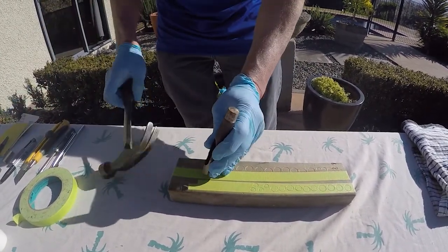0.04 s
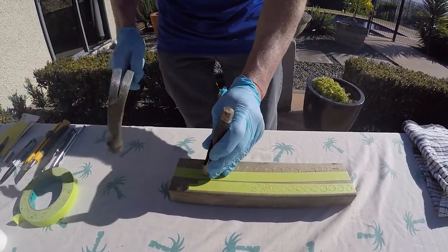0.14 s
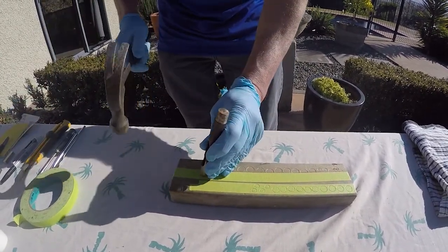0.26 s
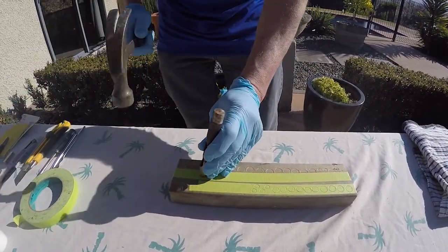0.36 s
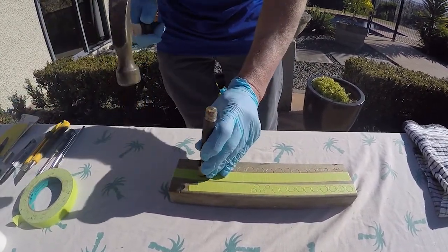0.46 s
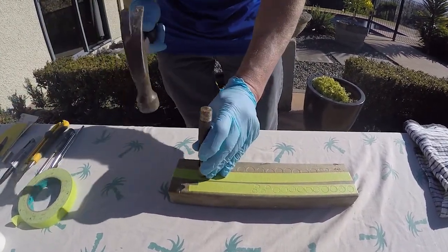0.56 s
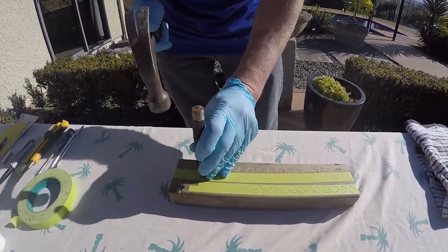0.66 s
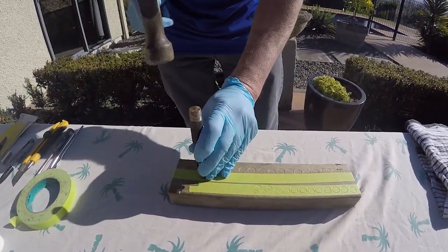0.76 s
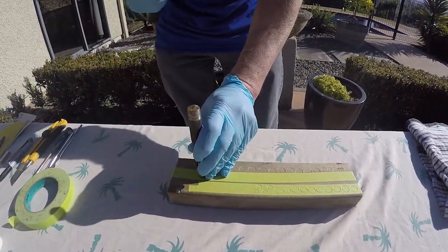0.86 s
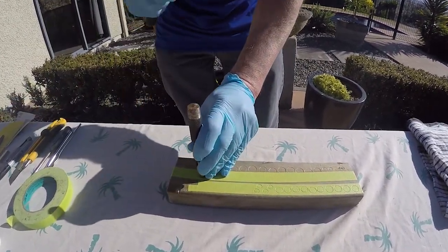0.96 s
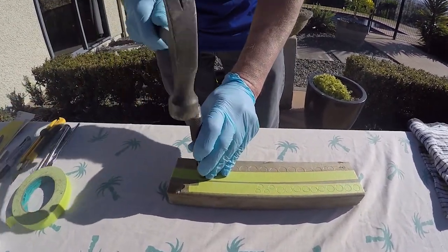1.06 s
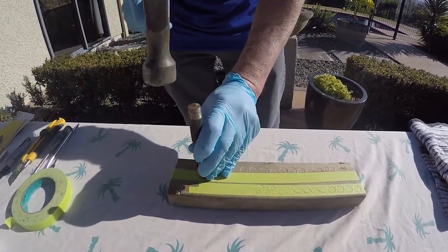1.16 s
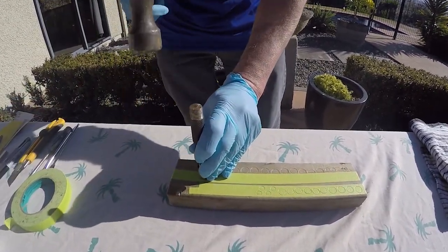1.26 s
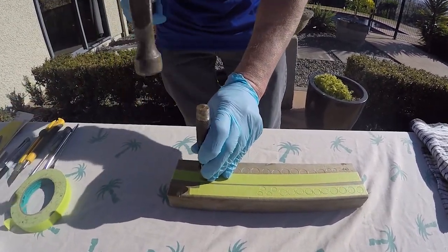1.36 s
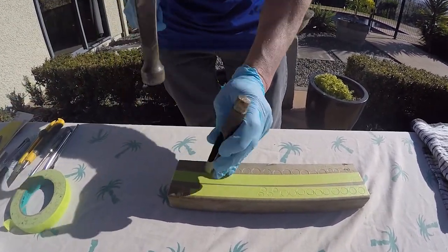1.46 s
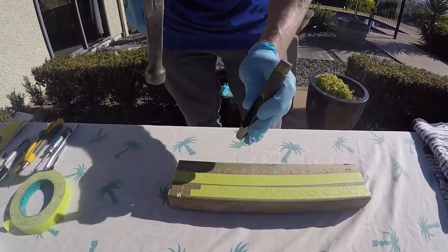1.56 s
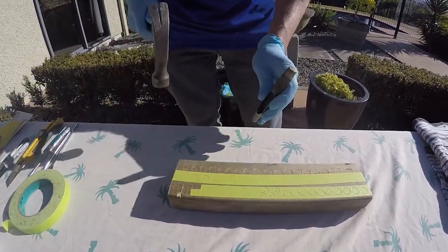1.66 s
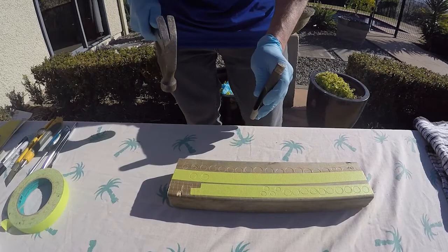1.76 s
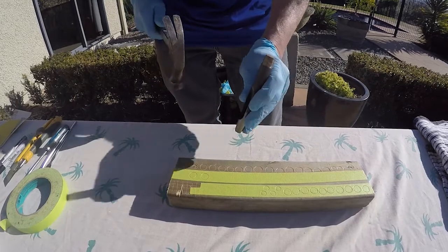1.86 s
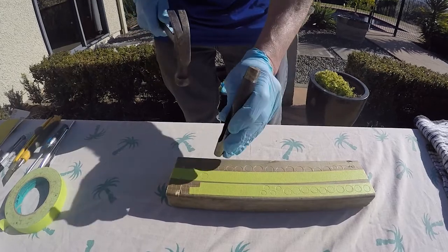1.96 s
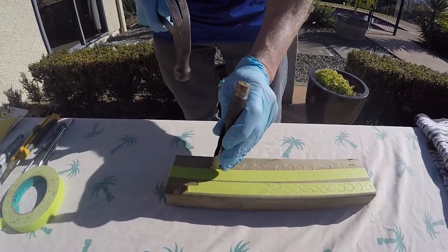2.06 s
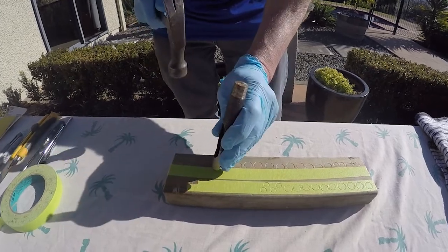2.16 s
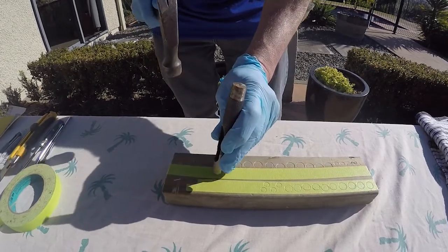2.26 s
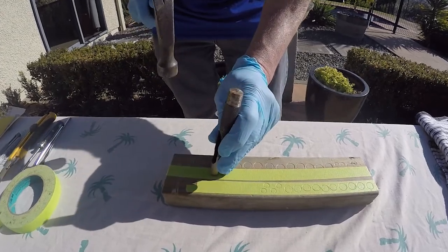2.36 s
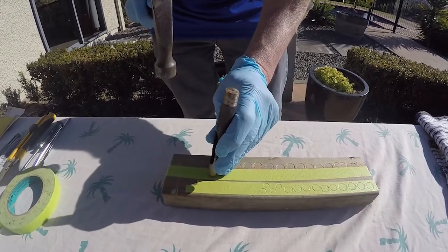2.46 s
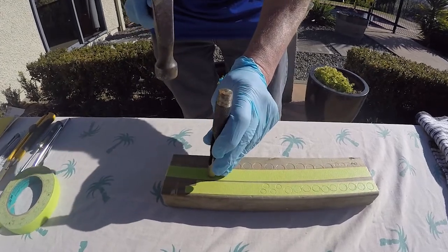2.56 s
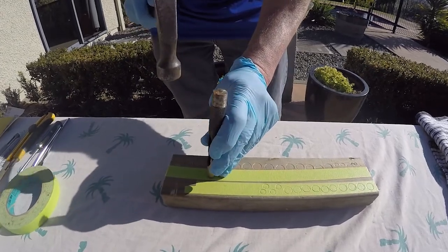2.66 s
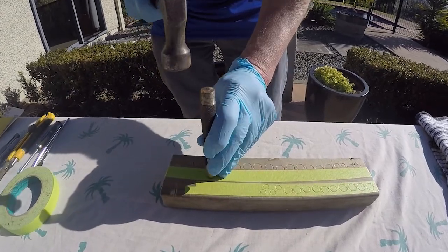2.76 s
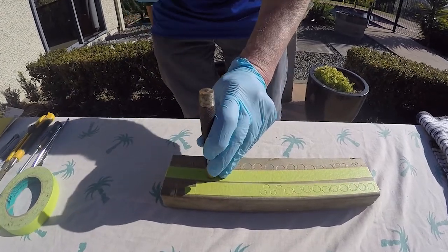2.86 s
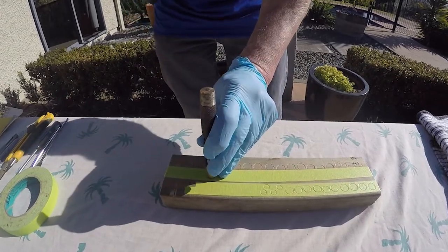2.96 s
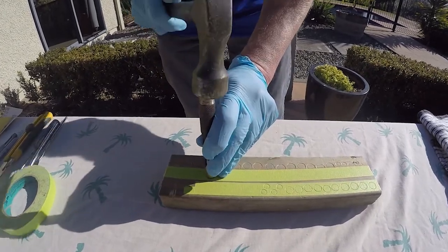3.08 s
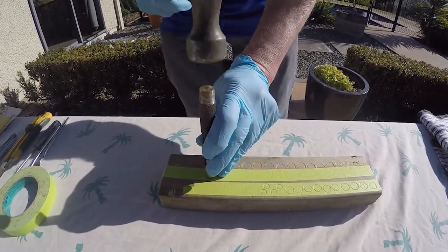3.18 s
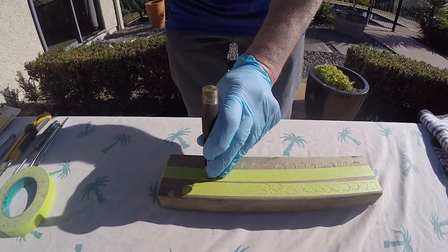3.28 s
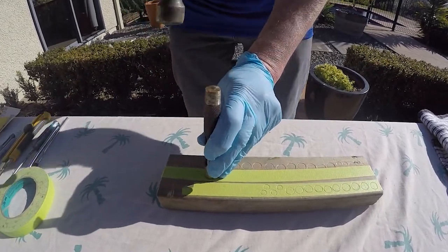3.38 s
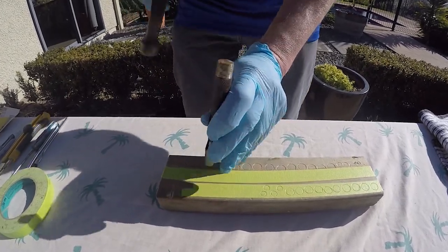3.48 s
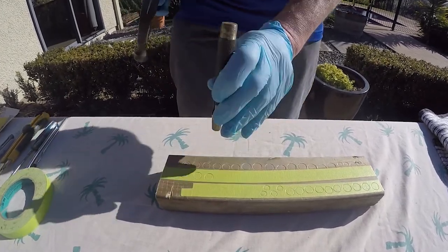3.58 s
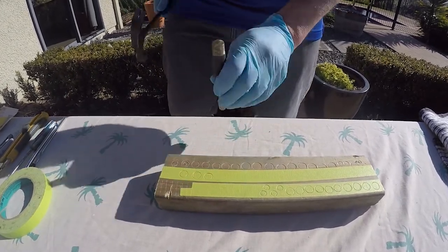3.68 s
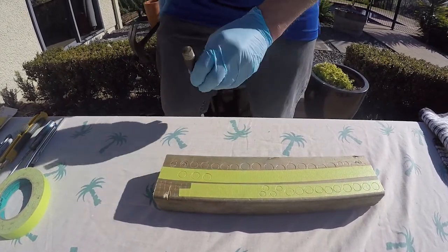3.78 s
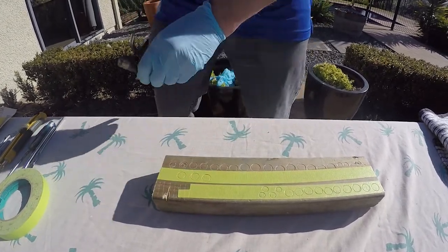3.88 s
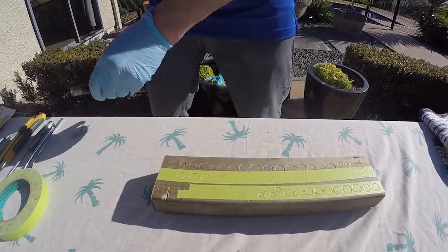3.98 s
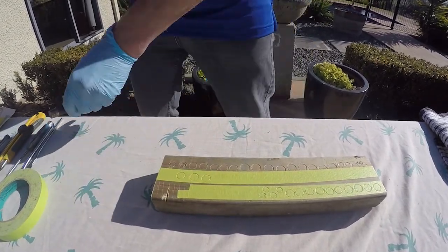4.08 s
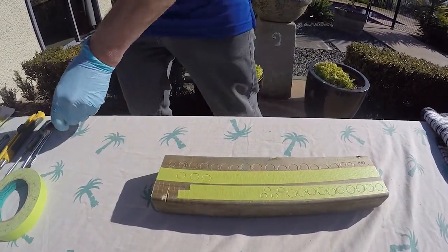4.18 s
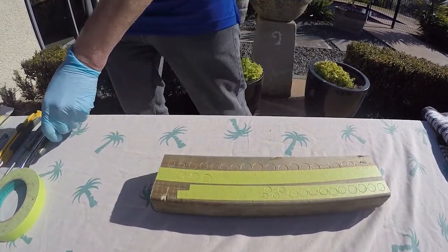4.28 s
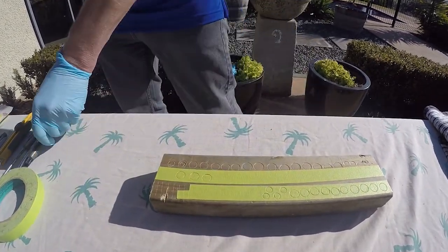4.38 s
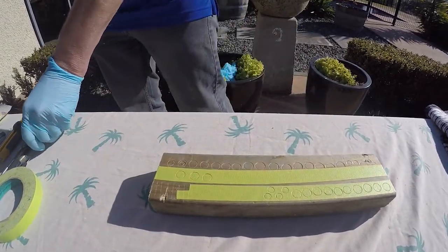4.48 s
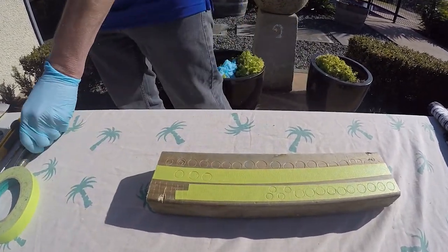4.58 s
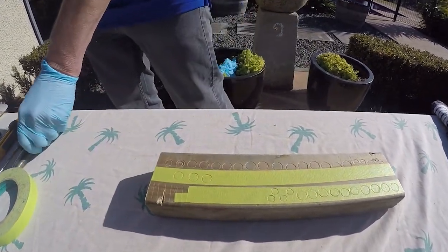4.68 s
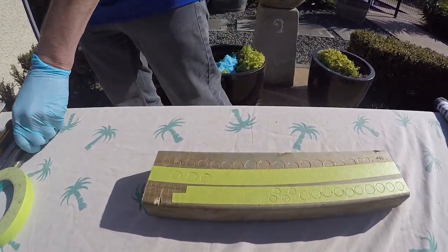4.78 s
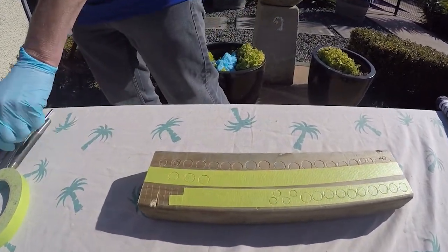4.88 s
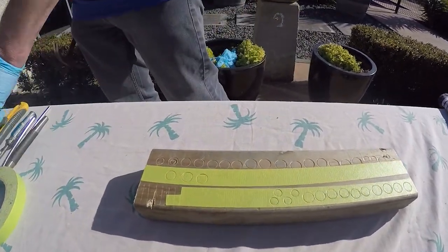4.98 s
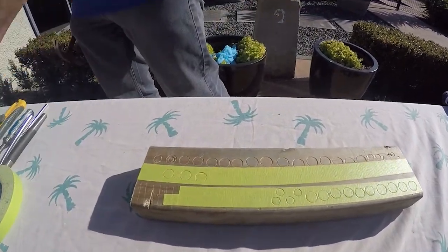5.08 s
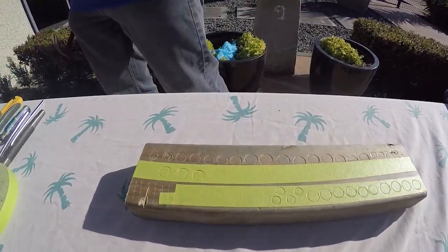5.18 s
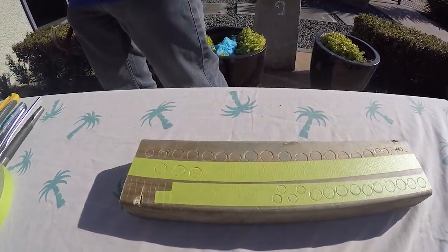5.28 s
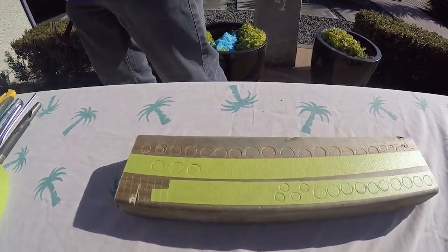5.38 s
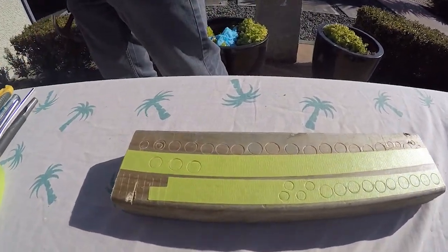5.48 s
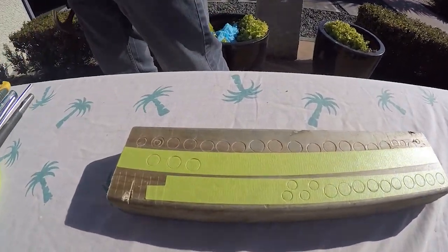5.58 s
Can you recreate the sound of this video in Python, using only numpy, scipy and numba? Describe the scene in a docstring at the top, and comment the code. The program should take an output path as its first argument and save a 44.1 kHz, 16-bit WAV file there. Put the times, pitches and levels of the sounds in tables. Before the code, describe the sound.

A close camera microphone on a patio table hears low, wavering machine hum around 40 to 80 Hz, rumble and soft outdoor air. Faint glove and cloth rubbing opens the scene; at 0.4 s a punch bumps softly onto a wooden block, and a far bird gives a thin downward whistle at 0.6 s. At 1.06 s a hammer hits the steel punch: an extremely loud, clipped crack, dry wood clack, low table thump and quick house echo, with the background ducked and slowly returning. A tiny tick follows at 1.4 s, the bird at 2.2 s, another soft bump at 2.5 s. The second, slightly duller blow lands at 3.09 s, with a faint pull-free scuff at 3.5 s. The bird whistles again at 3.9 s. Cloth rustles around 4.2 to 4.5 s, then the hammer's handle thuds and its head clacks on the table at 4.58 s. Light brushing leads to a short, dull camera knock at 5.55 s.

```python
"""On a patio, two hammer blows drive a steel hole punch through tape into a wooden block on a cloth-covered table.
Each blow is a set of dying tones and noise: steel cracks, wood clacks, the table thumps, the house echoes.
The blows overload the camera: their first moments clip, then its limiter turns the background down.
Soft noise makes the handling and rubbing; the hammer is put down, then the camera is knocked.
Behind it all are a wavering machine hum, rumble, outdoor air and a far bird's sliding whistles."""
import sys
import numpy as np
from scipy import signal
from scipy.fft import rfft, irfft
from scipy.io import wavfile
from scipy.ndimage import uniform_filter1d
from numba import njit

SR = 44100
rng = np.random.default_rng(int(sys.argv[2]) if len(sys.argv) > 2 else 0)


def store_pcm(level_fs):
    """Save levels as 16-bit WAV."""
    pcm = np.round(np.clip(level_fs, -1, 1) * 32767).astype(np.int16)
    wavfile.write(sys.argv[1], SR, np.atleast_2d(pcm).T)


N = 248660  # length in samples
TIME = np.arange(N) / SR  # seconds from the start
AGE = np.arange(SR) / SR  # seconds since a hit

# In all tables t60_s is the time a tone or noise takes to fade by 60 dB.
# Noise colours give only the balance between pitches; overall loudness is set where they are used.

# hammer blows: start_s, level_db, steel_db, brightness_db_per_octave, block_db, punch_ring_db,
# block_pitch_ratio, strongest_steel_hz
BLOWS = [(1.063, 15, 0, 0.5, 2.5, -1.5, .99, 2888), (3.0940, 17, 1, -0.5, 0, -9.5, 1.03, 3792)]
# hammer face and punch while they touch, before the brightness tilt: pitch_hz, level_db, t60_s
STEEL_MODES = [(1572, -1.5, 0.018), (2066, -3, 0.015), (2480, -6, 0.0089), (2870, -5, 0.018),
               (3870, -2, 0.0094), (4345, 0, .014), (5057, -0.5, 0.012), (5420, -5, 0.014),
               (6050, -7, .014), (7850, -9.5, 0.014)]
# noise colour of the crack, before the brightness tilt: pitch_hz, level_db_per_hz
CRACK_COLOUR = [(200, -2.5), (1000, -3), (2000, 0), (4500, 3), (6500, -5.5), (9000, -11.5), (15000, -19.5)]
# the punch ringing on in the gloved hand: pitch_hz, level_db, t60_s
PUNCH_MODES = [(2866, -30, .18), (3013, -32, .2), (7830, -40, 0.2), (7920, -38.5, .27), (8030, -37.5, .22),
               (8240, -42.5, .17)]
# the wooden block, before the blow's pitch ratio: pitch_hz, level_db, t60_s
BLOCK_MODES = [(326, -16, .14), (378, -20.5, 0.15), (449, -24.5, 0.14), (523, -22, .18), (631, -26.5, .16),
               (852, -29, .18), (904, -28, 0.22), (992, -19, 0.081), (1143, -27, .14), (1534, -25.5, 0.21),
               (1635, -25, 0.16), (2394, -28, .14), (2620, -28, .15), (3090, -30, 0.16)]
# the table top: pitch_hz, level_db, t60_s
TABLE_MODES = [(33.5, -9.5, .33), (47.5, -12, 0.13), (88, -15, .16), (114, 0.5, .14), (114, -20.5, .4),
               (160, -13, .07), (190, -30, 0.81), (220, -10, 0.082)]
# noise colour of the dense upper tones of block and table: pitch_hz, level_db_per_hz
WOOD_COLOUR = [(150, -2), (300, 1.5), (1000, 2), (1800, -6.5), (3000, -5.5), (5000, -18.5), (9000, -25),
               (15000, -36.5)]
# noise colour of a blow as the patio sends it back: pitch_hz, level_db_per_hz
PATIO_COLOUR = [(60, -5), (250, 2.5), (900, -1.5), (1700, -3.5), (3200, -10), (5000, -20), (8500, -27.5),
                (15000, -40)]
# noise colour of the farther garden's faint, long answer: pitch_hz, level_db_per_hz
GARDEN_COLOUR = [(150, -6), (400, 0), (1600, -4), (2400, -8), (3100, -5), (4200, -20), (15000, -50)]
# single hard reflections from the house: delay_s, level_db
HOUSE_SLAPS = [(.042, -31.5), (.095, -33), (.106, -47), (.137, -45.5)]
# the punch is set down on the tape before each blow: start_s, level_db
PLACINGS = [(.372, -39.5), (2.541, -39.5)]
# the punch is pulled free after each blow: start_s, level_db, centre_hz, width_octaves, t60_s
PULLS = [(1.441, -53, 8850, .3, 0.023), (3.472, -46, 1100, 0.91, .09)]
# the hammer head landing on the table: pitch_hz, level_db, t60_s
LANDING_MODES = [(182, -35, 0.27), (383, -35, 0.12), (592, -30.5, 0.17), (910, -13, 0.044),
                 (1139, -20, 0.085), (1430, -22, 0.091), (1717, -23, 0.06), (2040, -25.5, 0.09),
                 (2610, -20, 0.033), (3087, -21, 0.022), (4550, -38, 0.23), (4870, -43.5, 0.16),
                 (8204, -66, 0.24)]
# noise colour of that landing: pitch_hz, level_db_per_hz
LANDING_COLOUR = [(150, 0), (500, -2), (1000, 3.5), (2000, 0), (3200, -9), (4000, -19), (5000, -26),
                  (8000, -46), (15000, -69)]
# the camera housing when knocked: pitch_hz, level_db, t60_s
HOUSING_MODES = [(379, -33, 0.12), (534, -33, .14), (745, -27.5, 0.14), (995, -20.5, 0.071),
                 (1225, -27, 0.079), (1630, -25, 0.069), (2023, -30.5, 0.045)]
# noise colour of that knock: pitch_hz, level_db_per_hz
HOUSING_COLOUR = [(200, -9), (600, -3.5), (1200, 3.5), (1900, -13), (2500, -28), (3600, -28), (5000, -52),
                  (15000, -63)]
# glove and hammer sliding on cloth: start_s, length_s, level_db
SLIDES = [(-.1, 0.23, -54), (0.097, 0.14, -58.5), (4.193, .16, -57.5), (4.385, 0.08, -44.5),
          (4.435, 0.084, -47)]
# noise colour of the cloth: pitch_hz, level_db_per_hz
CLOTH_COLOUR = [(300, -13), (800, 6), (1500, 2), (2800, -4.5), (4500, -12), (8000, -21), (15000, -35)]
# gloves brushing over tools and camera: start_s, length_s, level_db
BRUSHES = [(4.23, .015, -57.5), (4.563, 0.012, -41), (5.476, .01, -50), (5.486, .018, -48),
           (5.517, .012, -55.5)]
# noise colour of the glove: pitch_hz, level_db_per_hz
GLOVE_COLOUR = [(300, -5), (1500, 4.5), (4500, -1), (8000, -8), (15000, -22)]
# a far bird repeats one call: start_s, level_db, final_hz
BIRD_CALLS = [(.635, -66, 3300), (2.225, -68, 2990), (3.885, -65, 3080)]
# hum of a distant machine, before it wavers: pitch_hz, rms_db
HUM_TONES = [(39.2, -42.5), (78.3, -39), (117.5, -51.5)]
# noise colour of the low rumble: pitch_hz, level_db_per_hz
RUMBLE_COLOUR = [(12, -9.5), (28, -1), (44, 0), (60, -2.5), (85, -0.5), (110, -3.5), (140, -15),
                 (200, -23.5), (400, -62.5)]
# noise colour of the outdoor air: pitch_hz, level_db_per_hz
AIR_COLOUR = [(76, -29), (130, -2.5), (179, -10), (205, -10.5), (373, -19.5), (512, -20.5), (650, -22.5),
              (858, -20), (2100, -32.5), (3310, -34.5), (4290, -37.5), (15000, -52.5)]

# the table springs back just after each blow
REBOUND_S, REBOUND_LENGTH_S, REBOUND_DB = 0.0033, 0.0046, 0
GARDEN_DB, GARDEN_T60_S = -52, 0.9
# nearby walls keep the echo up for a moment, then it drains into the garden
ECHO_RISE_S, ECHO_HOLD_S = 0.005, 0.062
ECHO_SAG_DB_PER_S, ECHO_FALL_DB_PER_S = 80, 183
# the dull answer of the block when the punch is placed
BUMP_HZ, BUMP_OCTAVES, BUMP_T60_S = 340, 0.65, 0.085
# the handle meets the cloth just before the hammer head lands
HAMMER_DOWN_S, HANDLE_LEAD_S = 4.5781, 0.012
HANDLE_DB, HANDLE_HZ, HANDLE_OCTAVES, HANDLE_T60_S = -26, 486, 0.63, 0.085
CAMERA_KNOCK_S = 5.5473
CALL_START_HZ, CALL_SLIDE_S, CALL_LENGTH_S = 4400, 0.078, 0.115
AIR_DB = -49.5
TOP_HZ = 15350  # the camera passes little above this pitch


def blows():
    """Steel cracks on steel; the block clacks; the table is pushed away from the microphone and springs back."""
    out = np.zeros(N)
    rebound_part = np.clip((AGE - REBOUND_S) / REBOUND_LENGTH_S, 0, 1)
    rebound = undb(REBOUND_DB) * np.sin(np.pi * rebound_part)
    table = rebound - swell(0.0027) * ring(TABLE_MODES)
    for s, db, steel_db, brightness, block_db, punch_db, pitch, strongest_hz in BLOWS:
        colour = tilted(CRACK_COLOUR, brightness)
        crack = ring(tilted(STEEL_MODES, brightness))
        crack += ring([(strongest_hz, -1, 0.017)])  # the steel tone driven hardest: Hz, dB, t60 s
        crack += undb(-2) * noise(colour, SR) * fade(0.022)
        steel = undb(steel_db) * crack + undb(punch_db) * ring(PUNCH_MODES)

        wood = ring(BLOCK_MODES, pitch) + undb(-12) * noise(WOOD_COLOUR, SR) * fade(0.1)
        block = undb(block_db) * swell(0.0011) * wood
        echo = undb(-25) * scatter(PATIO_COLOUR)
        add(out, s, undb(db) * (steel - block + table + echo))

        garden = noise(GARDEN_COLOUR, SR) * fade(GARDEN_T60_S)
        add(out, s, undb(db + GARDEN_DB) * garden)
        for delay_s, slap_db in HOUSE_SLAPS:
            slap = noise(colour, SR) * swell(0.001) * fade(0.04)
            add(out, s + delay_s, undb(db + slap_db) * slap)
    return out


def punch_handling():
    """The punch bumps the block as it is placed, and ticks as it comes out of the cut."""
    out = np.zeros(N)
    for s, db in PLACINGS:
        add(out, s, puff(db, BUMP_HZ, BUMP_OCTAVES, BUMP_T60_S))
    for s, db, hz, octaves, t60 in PULLS:
        add(out, s, puff(db, hz, octaves, t60))
    return out


def hammer_down():
    """The hammer is laid on the table: the handle thuds, then the head clacks and rings."""
    out = knock(HAMMER_DOWN_S, LANDING_MODES, LANDING_COLOUR,
                clack_db=-9, clack_t60=0.05, contact_s=0.00061, echo_db=-38)
    handle = swell(0.00072) * puff(HANDLE_DB, HANDLE_HZ, HANDLE_OCTAVES, HANDLE_T60_S)
    add(out, HAMMER_DOWN_S - HANDLE_LEAD_S, handle)
    return out


def camera_knock():
    """The camera housing is knocked: a short clack with dull, quickly fading tones."""
    return knock(CAMERA_KNOCK_S, HOUSING_MODES, HOUSING_COLOUR,
                 clack_db=-15.5, clack_t60=0.046, contact_s=0.0009, echo_db=-45)


def knock(s, modes, colour, clack_db, clack_t60, contact_s, echo_db):
    """A cushioned contact noise, the ring of the thing that was knocked, and its echo."""
    out = np.zeros(N)
    clack = undb(clack_db) * noise(colour, SR) * fade(clack_t60)
    echo = undb(echo_db) * scatter(colour)
    add(out, s, swell(contact_s) * (ring(modes) + clack) + echo)
    return out


def friction(strokes, colour, grain_db):
    """Each stroke of rubbing grows and fades, catching unevenly."""
    stroke_level = np.zeros(N)
    for s, length, db in strokes:
        part = np.clip((TIME - s) / length, 0, 1)
        stroke_level += undb(db) * np.sin(np.pi * part)
    grain = undb(grain_db * walk(300))
    return stroke_level * grain * noise(colour, N)


def bird():
    """Thin, fluttering whistles that slide down to a slightly wavering held note."""
    out = np.zeros(N)
    for s, db, final_hz in BIRD_CALLS:
        slide_hz = np.interp(TIME - s, [0, CALL_SLIDE_S], [CALL_START_HZ, final_hz])
        hz = slide_hz * (1 + 0.014 * walk(200))
        part = np.clip((TIME - s) / CALL_LENGTH_S, 0, 1)
        arch = 2 * np.sqrt(part * (1 - part))  # silent at both ends of the call
        flutter_db = 3.5 * walk(70)
        out += undb(db + flutter_db) * arch * np.sin(2 * np.pi * np.cumsum(hz) / SR)
    return out


def far(x, wet_db=-7):
    """A distant sound, smeared by its reflections."""
    response = scatter(CRACK_COLOUR)
    response = response / np.linalg.norm(response)
    return x + undb(wet_db) * signal.fftconvolve(x, response)[:N]


def background():
    """A machine hum wavering in pitch and level, over low rumble and steady outdoor air."""
    clock = np.cumsum(1 + 0.0023 * walk(3.2)) / SR  # all hum tones drift in pitch together
    hum = np.zeros(N)
    for hz, db in HUM_TONES:
        level = undb(db + 3.5 * walk(9)) * np.sqrt(2)  # rms to peak
        hum += level * np.sin(2 * np.pi * (hz * clock + rng.random()))
    rumble = undb(-42) * noise(RUMBLE_COLOUR, N)
    air = undb(AIR_DB) * noise(AIR_COLOUR, N)
    return hum + rumble + air


def scatter(colour, cluster_db=1.8):
    """Sound thrown in all directions comes back as a dense wash, in uneven clusters."""
    lost_db = ECHO_SAG_DB_PER_S * np.minimum(AGE, ECHO_HOLD_S)
    lost_db += ECHO_FALL_DB_PER_S * np.maximum(AGE - ECHO_HOLD_S, 0)
    clusters = cluster_db * walk(350)[:SR]
    return noise(colour, SR) * swell(ECHO_RISE_S) * undb(clusters - lost_db)


def puff(db, hz, octaves, t60):
    """A soft contact: a brief puff of noise around one frequency."""
    grid = np.geomspace(20, SR / 2, 40)
    hump_db = -30 * np.log10(1 + (np.log2(grid / hz) / octaves) ** 2)
    return undb(db) * noise(np.c_[grid, hump_db], SR) * fade(t60)


def ring(modes, pitch=1):
    """Struck things sound at several pitches at once, each dying away at its own pace."""
    out = np.zeros(SR)
    for hz, db, t60 in modes:
        out += undb(db) * fade(t60) * np.sin(2 * np.pi * hz * pitch * AGE)
    return out


def tilted(table, db_per_octave):
    """A squarer blow is brighter, a glancing one duller: tilt the levels about the middle pitch."""
    rows = np.array(table, float)
    rows[:, 1] += db_per_octave * np.log2(rows[:, 0] / np.median(rows[:, 0]))
    return rows


def noise(colour, size):
    """Random hiss shaped to a colour table, then scaled to rms 1."""
    hz, db = np.transpose(colour)
    bins = np.maximum(np.fft.rfftfreq(size, 1 / SR), 1)
    gain = undb(np.interp(np.log(bins), np.log(hz), db))
    x = irfft(rfft(rng.standard_normal(size)) * gain, size)
    return x / x.std()


def walk(rate):
    """Smooth random drift with a spread of about 1, from rate random steps per second."""
    k = int(SR / rate)
    steps = np.repeat(rng.standard_normal(N // k + 1), k)
    x = uniform_filter1d(uniform_filter1d(steps, k), k)[:N]
    return x / x.std()


def swell(rise_s):
    """Smooth build-up while two things press into each other."""
    return 1 - np.exp(-(AGE / rise_s) ** 2)


def fade(t60):
    """Energy drains steadily after a hit: down 60 dB after t60 seconds."""
    return np.exp(-np.log(1000) * AGE / t60)


def undb(db):
    """Decibels to gain."""
    return 10 ** (np.asarray(db) / 20)


def add(track, s, sound):
    """Mix a sound into a track at time s, cut off at the track's end."""
    start = int(s * SR)
    track[start:start + len(sound)] += sound[:len(track) - start]


def scene():
    """Work on the table over the sounds of the garden."""
    rubbing = friction(SLIDES, CLOTH_COLOUR, grain_db=2) + friction(BRUSHES, GLOVE_COLOUR, grain_db=3)
    work = blows() + punch_handling() + hammer_down() + camera_knock() + rubbing
    return (work + far(bird()) + background())[None]


@njit
def gain_reduction(over, attack, release):
    """Decibels to turn down: rises quickly towards the overshoot, then lets go at a steady rate."""
    out, cut = np.empty(len(over)), 0.
    for i in range(len(over)):
        if over[i] > cut:
            cut += attack * (over[i] - cut)
        else:
            cut = max(cut - release, 0.)
        out[i] = cut
    return out


def record(dry, threshold_db=-3.0, attack_s=0.0028, release_db_per_s=16):
    """The camera's limiter is too slow for the first milliseconds, which clip; then it recovers gradually."""
    over = 20 * np.log10(np.abs(dry[0]) + 1e-9) - threshold_db
    cut_db = gain_reduction(over, 1 / (attack_s * SR), release_db_per_s / SR)
    limited = dry * undb(-cut_db)
    clipped = 0.93 * limited / (1 + limited ** 6) ** (1 / 6)  # rounded clipping
    low_pass = signal.ellip(8, 0.2, 70, TOP_HZ, fs=SR, output="sos")
    return signal.sosfilt(low_pass, clipped)


dry = scene()
out = record(dry)
store_pcm(out)
```